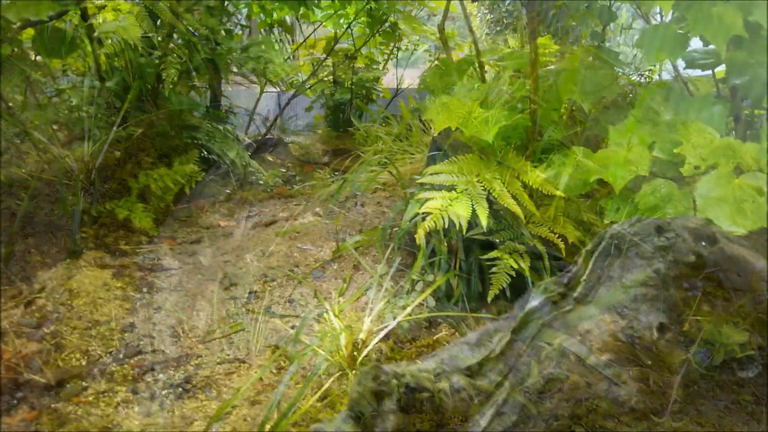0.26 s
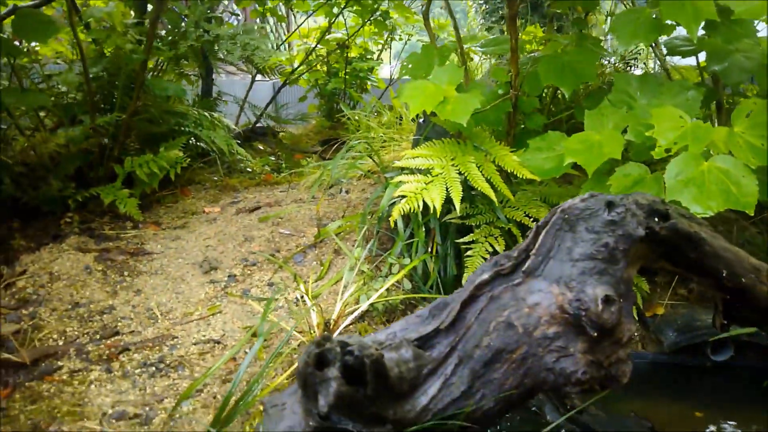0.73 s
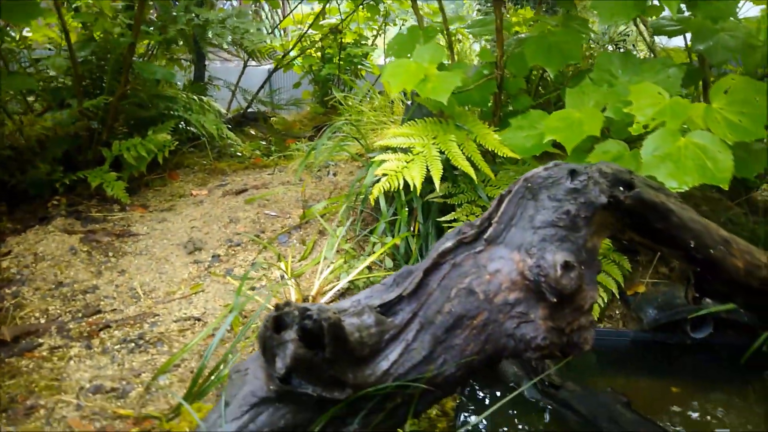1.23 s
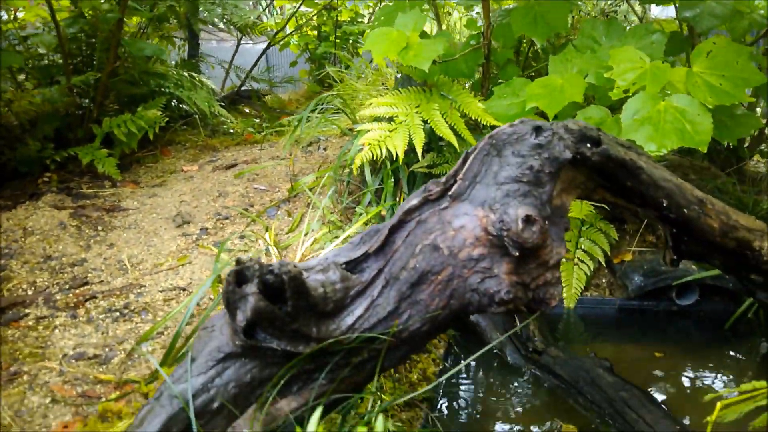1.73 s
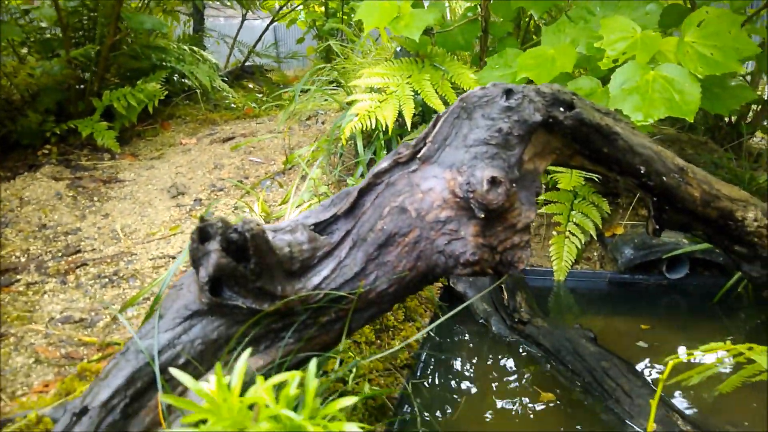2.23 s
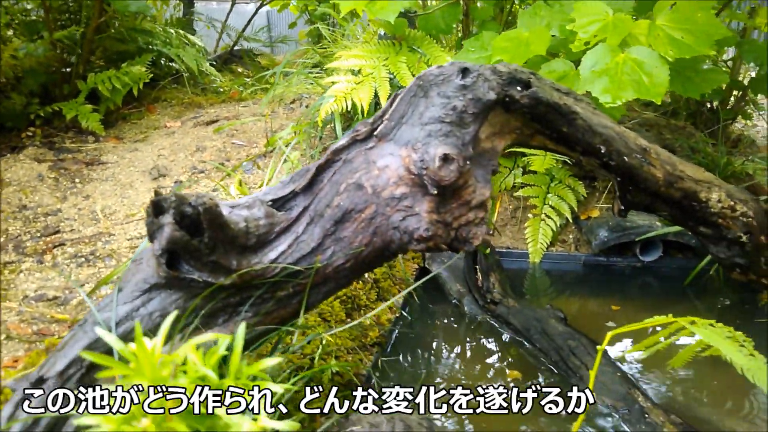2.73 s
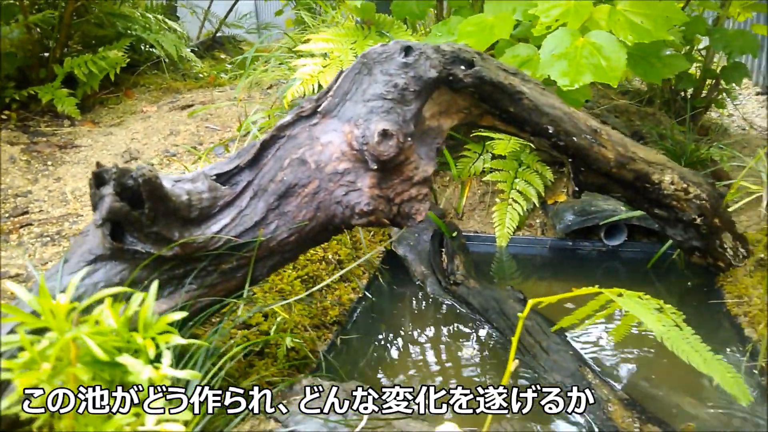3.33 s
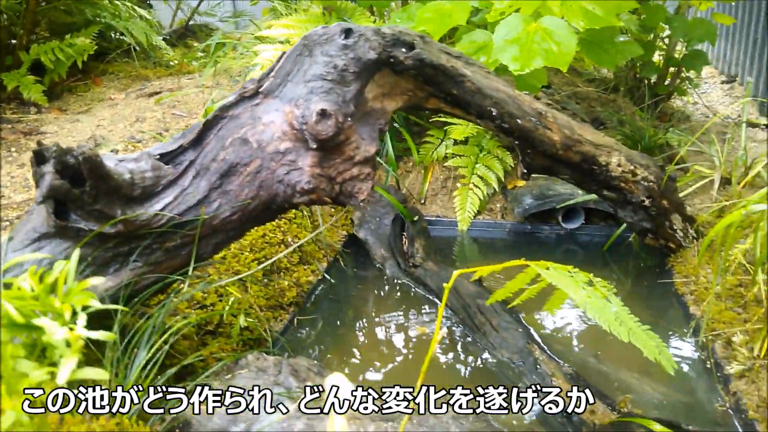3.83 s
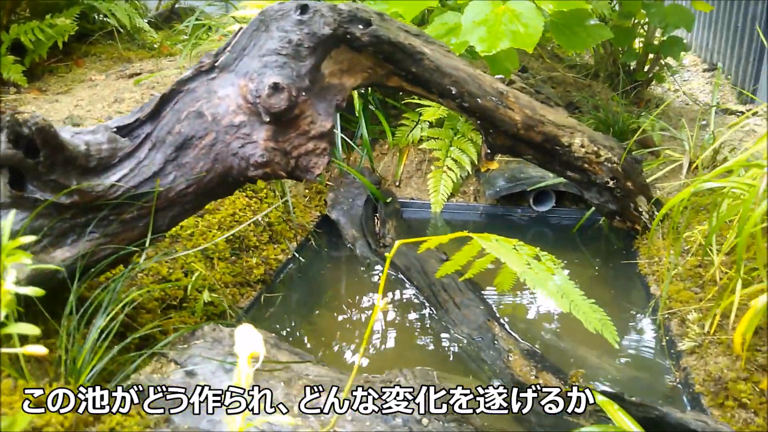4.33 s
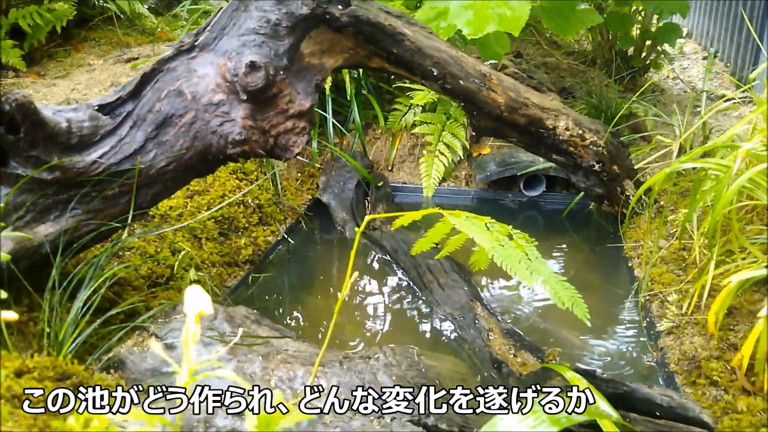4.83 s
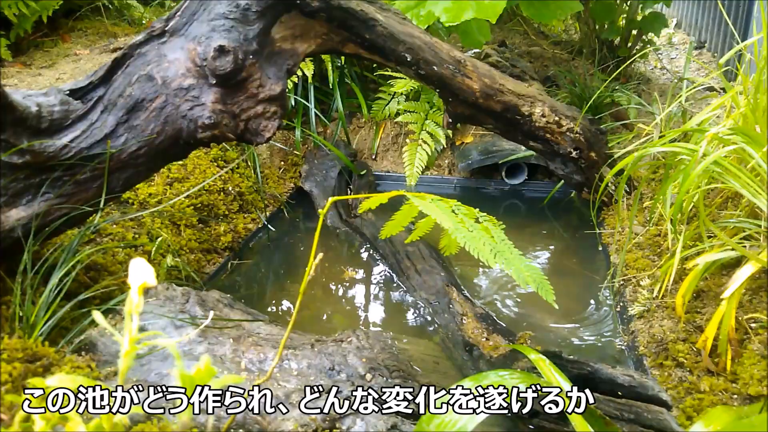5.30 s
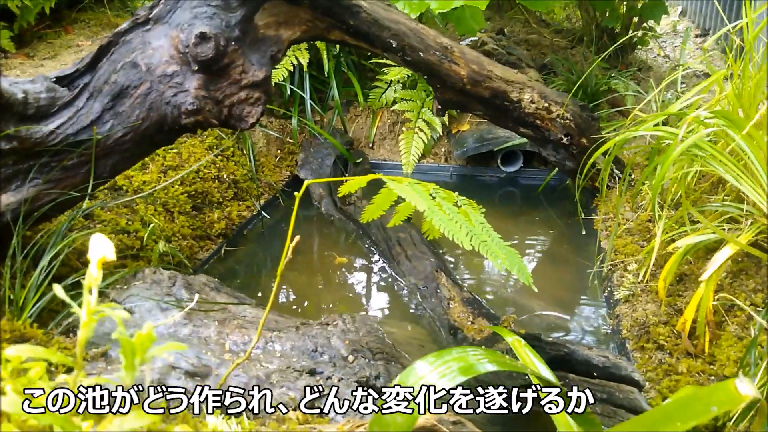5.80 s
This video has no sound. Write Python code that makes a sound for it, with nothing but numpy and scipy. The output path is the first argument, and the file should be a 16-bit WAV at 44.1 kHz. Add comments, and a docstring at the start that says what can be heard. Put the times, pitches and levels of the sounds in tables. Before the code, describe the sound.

Outdoor close-up of gentle rain on foliage and a small pond. A few sharp, high drips come first with airy hiss; under a second in, the background suddenly drops. Sparse drips follow, then patter, leaf ticks and pond plinks grow denser and stay lively. A low pump hum and rumble waver underneath, with soft bumps. The space is open and dry.

```python
"""Light rain in a garden, heard from a hand-held microphone: drips ring and smack on near leaves and pond,
ticks burst on hard leaves, short soft notes sound among the drops, and rain patters and hisses as shaped noise.
A pump hums as wavering sines over a noise rumble, with low bumps and longer swells of the hum near 120 Hz.
After three quarters of a second the spot changes abruptly to a quieter one by the pond;
from there the rain, after a brief ebb, swells again as the microphone nears the pond."""
import sys
import numpy as np
from scipy import signal
from scipy.fft import rfft, irfft, next_fast_len
from scipy.io import wavfile
from scipy.ndimage import uniform_filter1d, map_coordinates

SR = 44100
rng = np.random.default_rng(int(sys.argv[2]) if len(sys.argv) > 2 else 0)


def to_wav(s):
    """Save 16-bit WAV."""
    ch = np.atleast_2d(s).T  # columns
    pcm = np.round(np.clip(ch, -1, 1) * 32767)  # PCM
    wavfile.write(sys.argv[1], SR, pcm.astype(np.int16))


N = 267246
TIME_S = np.arange(N) / SR
CHANGE_S = 0.735  # the microphone's spot changes here

# The loudest drips, close to the microphone:
# (time [s], level [dB], ring [Hz], smack relative to level [dB], splash [dB], rise [1/s])
# The pitch climbs by twice the rise, as a share of the ring per second.
NEAR_DRIPS = [(0.0691, -25, 5200, -12, -41, 40), (0.092, -37, 6200, -15, -68, 40),
              (0.295, -24, 5820, -9, -35, 40.3), (0.3513, -32, 4560, -15, -54, 40),
              (0.365, -30, 5340, -15, -41, 35), (0.472, -40, 4870, -2, -46, 40),
              (0.5261, -32.5, 1690, -14, -49, 40), (0.549, -46.5, 1170, 2, -48, 40),
              (0.563, -44, 2600, 3, -43, 37), (1.284, -36, 6900, -21, -51, 35),
              (1.5407, -37.5, 7360, -15, -58, 40), (1.7728, -37.5, 6900, -5, -55, 40),
              (1.81, -44.5, 3030, -5, -64, 40), (1.893, -38, 6900, -1, -61, 40),
              (1.943, -35, 6800, -14, -63, 35), (2.083, -43, 6500, -7, -49, 40),
              (2.138, -39, 7200, -8, -63, 40), (2.274, -39, 7100, -6, -43, 37),
              (2.278, -31, 1490, -8, -48, 60), (2.2793, -37, 2300, -12, -49, 5),
              (2.282, -34, 1990, -9, -48.5, 20), (2.3288, -42, 1450, -9, -47.5, 40),
              (2.466, -46, 2800, 2, -58, 40), (2.7914, -38, 7900, -13, -54, 40),
              (2.9649, -29, 6970, -12, -43.5, 37), (3.132, -41, 1950, -6, -44.5, 40),
              (3.167, -36, 5530, -6, -42, 40), (3.196, -48, 6030, 0, -42, 40), (3.2, -39, 3460, 0, -53, 35),
              (3.278, -42, 1700, 0, -54, 40), (3.2962, -36, 1900, -8, -55, 20),
              (3.2924, -30, 7100, -8, -51, 40), (3.331, -32, 7100, -7, -60, 40),
              (3.4053, -37.5, 2650, -5, -47, 40), (3.482, -44, 1900, 4, -47, 40),
              (3.5452, -26, 2880, -21, -52, 24), (3.5455, -33, 5960, -6, -55, 40),
              (3.694, -31.5, 2530, -7, -48, 46), (3.7216, -40, 2930, -11, -46, 40),
              (3.876, -26.5, 2830, -16, -38.5, 60), (4.039, -26, 7000, -8, -39, 40),
              (4.052, -35, 3280, -19, -49, 37), (4.1071, -36, 7450, -20, -56, 40),
              (4.3834, -31, 1470, -15, -44, 40), (4.3855, -35, 1100, -8, -55, 40),
              (4.385, -40, 6360, -6, -49, 40), (4.3877, -33, 1580, -20, -56, 40),
              (4.4282, -32, 7200, -11, -46, 40), (4.5332, -13.5, 1600, -22, -41, 150),
              (4.533, -25.5, 6720, -6, -43, 44), (4.5342, -23.5, 2950, -10, -60, 36),
              (4.549, -34, 2540, -12, -50, 34), (4.57, -44, 1730, -10, -46, 40),
              (4.614, -30, 2830, -25, -48, 66), (4.7636, -37, 6900, -2, -58, 40),
              (4.8917, -39, 2870, -6, -45, 40), (4.958, -42, 2050, -1, -50, 40),
              (5.1462, -32, 1580, -9.5, -50, 40), (5.1462, -35, 5600, 3, -41, 40),
              (5.1468, -41, 3330, 4, -41, 40), (5.305, -40, 980, -4, -50, 40),
              (5.3057, -35, 4600, -8, -48, 5), (5.316, -41, 2980, -1, -48, 20),
              (5.3165, -40, 6500, -1, -46, 40), (5.333, -36, 7000, -6, -50, 40),
              (5.335, -35, 4640, -3, -49, 20), (5.337, -36.5, 7500, -6, -54, 20),
              (5.3341, -39.5, 1720, 1, -51, 40), (5.563, -31.5, 6450, -6, -43, 40),
              (5.6166, -35.5, 2760, -17, -47, 31), (5.864, -38, 3220, -8, -49, 45),
              (5.8727, -30, 6800, -12, -41, 40), (5.89, -39, 7500, -4, -48, 40),
              (5.8963, -33, 7100, -12, -47, 40), (6.032, -30.5, 6760, -12, -43, 40)]
FAINT_DRIP_DB, FAINT_DRIP_HZ, FAINT_DRIP_OCTAVES = -45.5, 3360, 1  # level, middle pitch, its spread
FAINT_SMACK_DB, FAINT_SPLASH_DB, FAINT_RISE = -22, -12, 32  # both relative to the drip's level; rise [1/s]
DULL_UNDER_HZ, PLINK_UNDER_HZ = 2400, 3600  # drips between the two limits fall in the pond
DULL_T60_S, PLINK_T60_S, RING_T60_S = 0.0032, 0.009, 0.0041  # 60 dB decay: soft ground, pond, elsewhere
ATTACK_TURNS, PLINK_TURNS = 1.2, 2.2  # time constants of the build-up, in cycles
ECHO_S, PLINK_ECHO_S = 0.0016, 0.0034  # echo delay elsewhere and in the pond


def drips():
    """A drop's blow is a smack and a short rising ring, echoed off a near surface; a splash fades after it."""
    out, t = np.zeros(N + SR), np.arange(SR // 8) / SR
    others = []
    for s, db, c in zip(*faint(count=16, level_db=FAINT_DRIP_DB)):
        hz = np.clip(FAINT_DRIP_HZ * 2 ** (FAINT_DRIP_OCTAVES * c), 900, 8000)
        others.append((s, db, hz, FAINT_SMACK_DB, db + FAINT_SPLASH_DB, FAINT_RISE))
    for s, db, hz, smack_db, splash_db, rise in NEAR_DRIPS + others:
        smack_noise, splash_noise = rng.standard_normal((2, len(t)))
        if hz < DULL_UNDER_HZ:  # low drips land on something soft and die sooner
            turns, t60, echo_s = ATTACK_TURNS / 5, DULL_T60_S, ECHO_S
        elif hz < PLINK_UNDER_HZ:
            turns, t60, echo_s = PLINK_TURNS, PLINK_T60_S, PLINK_ECHO_S
        else:
            turns, t60, echo_s = 2 * ATTACK_TURNS, RING_T60_S, ECHO_S
        shape = (1 - np.exp(-t * hz / turns)) ** 2 * amp(-60 * t / t60)
        ring = shape / shape.max() * np.sin(2 * np.pi * hz * t * (1 + rise * t))
        smack_shape = (1 - np.exp(-t * hz / ATTACK_TURNS)) * amp(-60 * t / 0.008)
        smack = band(smack_noise, hz * 0.6, hz * 1.45, smack_shape)
        blow = 0.5 * ring + amp(smack_db) * smack
        delayed = np.pad(blow, (round(echo_s * SR), 0))
        # a small surface returns treble best, hence the slope of the delayed blow
        blow += 0.28 * np.diff(delayed)[:len(t)] * SR / (2 * np.pi * hz)
        splash_shape = amp(-60 * t / 0.14) * (1 - np.exp(-t / 0.0022))
        splash = amp(splash_db) * band(splash_noise, hz * 0.68, hz * 1.34, splash_shape)
        out[round(s * SR):][:len(t)] += amp(db) * blow + splash
    return out[:N]


# The loudest drops bursting on hard leaves: (time [s], level [dB], lower band edge [Hz])
LEAF_TICKS = [(0.2957, -48, 7490), (0.5297, -51, 7110), (0.8026, -49, 7340), (1.4955, -49, 7040),
              (1.772, -48, 8060), (1.8902, -38, 7400), (1.942, -41, 7100), (2.177, -47, 7140),
              (2.286, -44, 7500), (2.4916, -36.5, 7400), (2.6179, -45, 7360), (2.7694, -43, 7900),
              (2.9347, -42, 7000), (3.157, -31.5, 8300), (3.1951, -43, 7110), (3.2914, -38, 7700),
              (3.545, -49, 7330), (3.6604, -47, 7020), (3.733, -48, 7350), (3.8756, -41, 7300),
              (3.8914, -44, 7400), (3.91, -39, 7850), (4.1066, -42.5, 7600), (4.1904, -44, 7410),
              (4.2353, -43, 7200), (4.2847, -46, 7120), (4.4284, -33, 7800), (4.533, -43, 7230),
              (4.9464, -49, 7330), (5.0114, -41, 7580), (5.0315, -44, 7160), (5.2374, -44, 7030),
              (5.3704, -47, 7680), (5.4064, -49, 8130), (5.5013, -43, 7480), (5.5297, -43, 7100),
              (5.5774, -47, 7520), (5.6096, -44, 7400), (5.6364, -46, 7660), (5.674, -48, 7150),
              (5.6954, -48, 7710), (5.7998, -36, 8060), (5.8834, -46, 7380), (5.8955, -44, 7600),
              (6.036, -40, 7400)]
FAINT_TICK_DB, FAINT_TICK_HZ = -55, 8500
TICK_PEAK_S = 0.0009  # the envelope of a tick peaks this long after its start


def ticks():
    """A drop bursting on a hard leaf gives a millisecond or two of treble, with a faint spray after it."""
    out, t = np.zeros(N + SR), np.arange(SR // 20) / SR
    u = t / TICK_PEAK_S
    burst = u ** 5 * np.exp(5 * (1 - u))
    spray = 0.1 * (1 - np.exp(-u)) * amp(-60 * t / 0.05)
    others = [(s, db, np.clip(FAINT_TICK_HZ * 1.05 ** c, 7000, 12000))
              for s, db, c in zip(*faint(count=70, level_db=FAINT_TICK_DB))]
    for s, db, hz in LEAF_TICKS + others:
        tick = band(rng.standard_normal(len(t)), hz, 1.6 * hz, burst + spray)
        out[round(s * SR):][:len(t)] += amp(db) * tick
    return out[:N]


# Short soft notes among the drops: (time [s], level [dB], pitch [Hz], length [s])
SOFT_NOTES = [(0.045, -53.5, 1225, 0.015), (0.104, -51, 2420, 0.019), (0.129, -51, 750, 0.023),
              (0.228, -56, 1747, 0.028), (0.279, -52, 2420, 0.028), (0.338, -51.5, 1646, 0.032),
              (0.542, -51.5, 1048, 0.048), (0.716, -52.5, 930, 0.014), (2.076, -51.5, 1570, 0.032),
              (3.58, -56, 1470, 0.014), (4.124, -53.5, 347, 0.067), (4.204, -49.5, 1567, 0.027),
              (4.821, -52, 1013, 0.023), (4.828, -53, 449, 0.036), (4.985, -47, 4150, 0.035),
              (5.171, -48, 2910, 0.014), (5.337, -49, 1560, 0.027)]


def soft_notes():
    """Each swells and fades on one unsteady, slightly rising pitch."""
    out = np.zeros(N)
    for s, db, hz, length in SOFT_NOTES:
        t = np.arange(round(length * SR)) / SR
        drift = 0.13 * np.cumsum(rng.standard_normal(len(t)))  # the phase wanders
        note = np.sin(2 * np.pi * hz * t * (1 + 0.019 * t / length) + drift)
        out[round(s * SR):][:len(t)] += amp(db) * np.sin(np.pi * t / length) * note
    return out


# Spectrum of the patter of small drops at the first spot: (frequency [Hz], relative level [dB])
FIRST_PATTER_SPECTRUM = [(150, -19), (220, -4), (400, -2), (720, -0.5), (1300, -6.5), (1700, -0.5),
                         (2200, -6.5), (2900, -1), (4500, -12), (5900, -26)]
# The same near the pond: (frequency [Hz], relative level [dB])
POND_PATTER_SPECTRUM = [(150, -6), (250, -8), (383, 3), (523, -4.5), (760, -4.5), (1010, 2.5), (1180, -4.5),
                        (2280, -2.5), (3070, 0), (4250, -3.5), (5500, -3.5), (7150, -2), (12100, -120)]


def patter(flurry):
    """Small drops on leaves: patchy noise with impacts, and many short rings."""
    first = rainfall(FIRST_PATTER_SPECTRUM, 3.2, -6, 4, count=1000)
    pond = rainfall(POND_PATTER_SPECTRUM, 2.3, -6, 4, count=2000)
    drops = at_spots(first, pond)
    drops += amp(-12) * droplets(count=900, centre_hz=3040, octaves=0.363, cycles=22.5, spread_db=5.5)
    long_rings = droplets(count=900, centre_hz=1700, octaves=0.75, cycles=80, spread_db=3)
    drops += amp(at_spots(-5, -8)) * long_rings
    return amp(spot_level(0) + 2.5 * flurry) * drops


# Spectrum of the far rain at the first spot: (frequency [Hz], relative level [dB])
FIRST_HISS_SPECTRUM = [(2060, -53), (3500, -16), (4230, -3.5), (6160, 1), (7620, -1.5), (10700, -22),
                       (14300, -23)]
# The same near the pond: (frequency [Hz], relative level [dB])
POND_HISS_SPECTRUM = [(2650, -58), (4500, -50), (5130, -11.5), (7440, 9), (9250, 0), (13600, -9.5),
                      (14300, -15)]
FIRST_HISS_FADES = 0.73  # dB per s at the first spot, as the microphone turns away


def far_hiss(flurry):
    """Far rain: countless drops merge into treble noise that flickers in level."""
    first = rainfall(FIRST_HISS_SPECTRUM, 1.5, -6, 4, count=2500)
    pond = rainfall(POND_HISS_SPECTRUM, 1.9, -6, 4, count=2500)
    level_db = spot_level(1) - FIRST_HISS_FADES * at_spots(TIME_S, 0)
    flicker = 1.25 * flurry + calm() * (1.24 * wobble(13) + 1.36 * wobble(25))
    return amp(level_db + flicker) * at_spots(first, pond)


# Low bumps, and longer swells of the hum near 120 Hz:
# (time [s], level before a common boost [dB], pitch [Hz], swings until 60 dB down [cycles])
LOW_SWELLS = [(0.053, -52, 53.5, 5.7), (0.37, -46, 158, 6.7), (0.713, -50, 77, 3.1),
              (2.2753, -52.5, 145, 2.8), (2.831, -60, 119.3, 36), (3.203, -60, 123, 12),
              (3.339, -56, 119, 26), (3.406, -57, 119.4, 30), (3.414, -54.5, 224, 10),
              (3.939, -59.5, 119, 22), (4.644, -48.5, 148, 3.5), (4.675, -53, 53.8, 4.9),
              (4.979, -59, 207, 12), (6.024, -53, 54, 5.6)]


def low_swells():
    """Each is a low sine that builds and dies away, with a higher, briefer sine at its start."""
    out, t = np.zeros(N + SR), np.arange(SR // 4) / SR
    for s, db, hz, swings in LOW_SWELLS:
        swing = np.sin(2 * np.pi * hz * t)
        swing += 0.77 * amp(-60 * t / 0.04) * np.sin(2 * np.pi * 1.57 * hz * t)
        onset = 1 - np.exp(-t * hz / (0.041 * swings))
        out[round(s * SR):][:len(t)] += amp(db + 12.5 - 60 * t * hz / swings) * onset * swing
    return out[:N]


# Lines of the pump, somewhere off:
# (pitch [Hz], waver rate [knots/s], waver depth [dB], level before a common boost [dB])
PUMP_LINES = [(39.6, 1.23, -1, -4), (58.8, 4, 4, -11)]


def pump_hum():
    """The pump's low lines, sines that waver in pitch and strength."""
    return amp(spot_level(2)) * sum(wavering_line(*line) for line in PUMP_LINES)


# Spectrum of the background rumble: (frequency [Hz], relative level [dB])
RUMBLE_SPECTRUM = [(34, -65), (42, -16), (62, -2), (85, -4), (108, -3.5), (120, 2), (133, -4), (170, -9.5),
                   (300, -15.5), (400, -54)]
# Level of the rumble at the pond spot: (time [s], level [dB])
POND_RUMBLE = [(.74, -72), (1.4, -70.5), (1.9, -63), (2.4, -67), (2.9, -62), (3.45, -60.5), (4.2, -62.5),
               (4.9, -62), (5.4, -64.5), (6.06, -62.5)]
# A pump line that swells with the rumble:
# (pitch [Hz], waver rate [knots/s], waver depth [dB], level before a common boost [dB])
PUMP_OVERTONE = (119.5, 10, 4, -9)
FIRST_RUMBLE_DB = -61.5


def rumble():
    """Low noise of slowly changing level, and the pump's overtone rising and falling with it."""
    level_db = np.interp(TIME_S, *np.transpose(POND_RUMBLE), left=FIRST_RUMBLE_DB)
    noise = amp(2 * wobble(14)) * rainfall(RUMBLE_SPECTRUM, 1.5, -14, 3, count=100)
    return amp(level_db) * (noise + wavering_line(*PUMP_OVERTONE))


def wavering_line(hz, rate, depth_db, db):
    """A sine whose pitch and level drift randomly; a faster waver also bends the pitch further."""
    phase = 2 * np.pi * np.cumsum(hz + 0.409 * rate * wobble(rate)) / SR
    return amp(db + 6 + depth_db * wobble(rate * 2)) * np.sin(phase)


# Swell of the rain at the pond spot: (time [s], change of level [dB])
RAIN_SWELL = [(.74, -6.5), (1.3, -8.5), (1.7, -5), (2.2, -2), (2.5, -1.5), (3.1, -2), (3.45, 0),
              (4.2, 0.64), (5.0, 0), (6.06, 0.5)]


def swell(s):
    """Strength of the rain in dB at the times s; the first spot stays at 0 dB."""
    return np.interp(s, *np.transpose(RAIN_SWELL), left=0)


FIRST_SPOT_DB = (-58, -53, -59)  # (patter [dB], far hiss [dB], hum [dB])
# Levels near the pond before the swell: (patter [dB], far hiss [dB], hum [dB])
POND_SPOT_DB = (-54, -58, -60.5)
# How far each follows the swell: (patter [dB/dB], far hiss [dB/dB], hum [dB/dB])
SWELL_SHARE = (1.336, 0.43, 1)


def spot_level(column):
    """Level in dB over time of one column, steady at the first spot and swelling at the pond."""
    return at_spots(FIRST_SPOT_DB[column], POND_SPOT_DB[column] + SWELL_SHARE[column] * swell(TIME_S))


def at_spots(first, pond):
    """One value before the spot changes and the other after."""
    return np.where(TIME_S < CHANGE_S, first, pond)


def calm():
    """Share of the level's unrest; the first spot is steadier."""
    return at_spots(0.7, 1)


def gusts():
    """Short gusts of drops, as a random curve shared by patter and hiss."""
    return calm() * (0.11 * wobble(17) + 0.57 * wobble(16))


def faint(count, level_db):
    """Random times and levels of weaker drops that follow the swell, and a spare normal value each."""
    s, (a, b) = rng.random(count) * N / SR, rng.standard_normal((count, 2)).T
    return s, level_db + swell(s) + 3 * np.clip(a, -2, 1.3), b


def rainfall(spectrum, patchy_db, ticks_db, spread_db, count):
    """Patchy noise of countless drops plus count single impacts of uneven size, rms 1."""
    z = signal.stft(rng.standard_normal(N), nperseg=512)[2]
    field = uniform_filter1d(rng.standard_normal(z.shape), size=5, axis=0)  # smooth over frequency
    field = uniform_filter1d(field, size=6, axis=1)  # and over time
    wash = unit(signal.istft(z * amp(patchy_db * unit(field)), nperseg=512)[1][:N])
    at, size = rng.random((count, 2)).T
    starts = np.bincount((at * N).astype(int), uneven(size, spread_db), N)
    t = np.arange(600) / SR
    splat = amp(-60 * t / 0.019) * (1 - np.exp(-t / 0.0016))  # each impact is a few ms of noise
    impacts = unit(np.convolve(starts, splat)[:N] * rng.standard_normal(N))
    return unit(filtered(wash + amp(ticks_db) * impacts, lambda hz: amp(along(spectrum, hz))))


def droplets(count, centre_hz, octaves, cycles, spread_db):
    """Small drops, each ringing for some cycles after a soft start, rms 1."""
    at, size, rise = rng.random((count, 3)).T[:, :, None]
    hz = np.clip(centre_hz * 2 ** (octaves * rng.standard_normal((count, 1))), 300, 12000)
    k = np.arange(1600)
    turns = hz * k / SR
    shape = amp(-60 * turns / cycles) * (1 - np.exp(-turns * 12 / cycles))
    ring = np.sin(2 * np.pi * turns * (1 + 0.12 * rise * turns / cycles))
    rows = uneven(size, spread_db) * shape * ring
    places = (at * N).astype(int) + k
    return unit(np.bincount(places.ravel(), rows.ravel(), N + len(k))[:N])


def uneven(share, spread_db):
    """Drop sizes: many small, few large, none beyond a limit."""
    return amp(-spread_db * np.log(1 - 0.97 * share))


def band(x, low_hz, high_hz, decay):
    """x through a causal band-pass, shaped by decay, peak 1."""
    sos = signal.butter(3, [low_hz, min(high_hz, 15200)], "bandpass", fs=SR, output="sos")
    y = decay * signal.sosfilt(sos, x)
    return y / np.abs(y).max()


def amp(db):
    """Decibels to gain."""
    return 10 ** (np.asarray(db) / 20)


def unit(x):
    """x at rms 1."""
    return x / np.sqrt(np.mean(x ** 2) + 1e-20)


def along(points, hz):
    """(frequency [Hz], level [dB]) points on a log frequency axis, -120 dB outside them."""
    f, v = np.transpose(points)
    return np.interp(np.log(hz + 1), np.log(f + 1), v, left=-120, right=-120)


def wobble(rate):
    """A smooth random curve, rate knots a second."""
    knots = rng.standard_normal(int(N * rate / SR) + 4)
    return map_coordinates(knots, [np.arange(N) * rate / SR])


def filtered(x, response):
    """x times a response of frequency."""
    m = next_fast_len(N + 8192)
    return irfft(rfft(x, m) * response(np.fft.rfftfreq(m, 1 / SR)), m)[..., :N]


def scene():
    """Near drops, patter, far rain, low swells and pump all reach one microphone."""
    flurry = gusts()
    near = drips() + ticks() + soft_notes()
    background = far_hiss(flurry) + low_swells() + pump_hum() + rumble()
    return (near + patter(flurry) + background)[None]


TREBLE_TOP_HZ, TOP_HZ = 14400, 15400  # only a trace passes between the two, nothing above


def record(dry):
    """The microphone's bass cut, band limit and slight constant offset."""
    def response(hz):
        return (hz > 34) * np.where(hz < TREBLE_TOP_HZ, 1, amp(-54)) * (hz < TOP_HZ)
    return filtered(dry, response) - 0.0005


dry = scene()
out = record(dry)
to_wav(out)
```